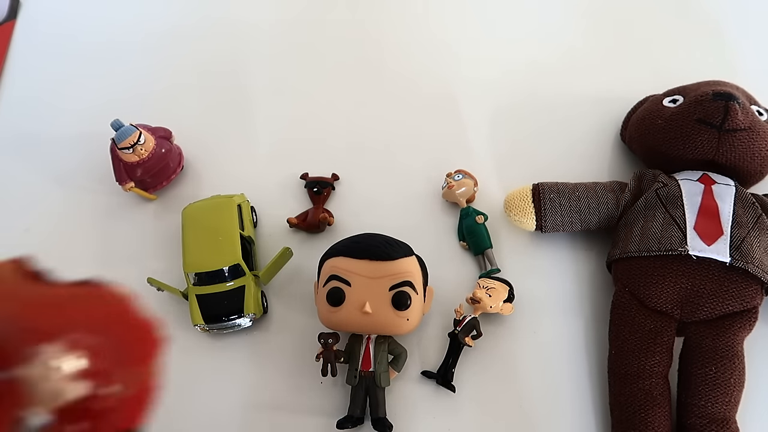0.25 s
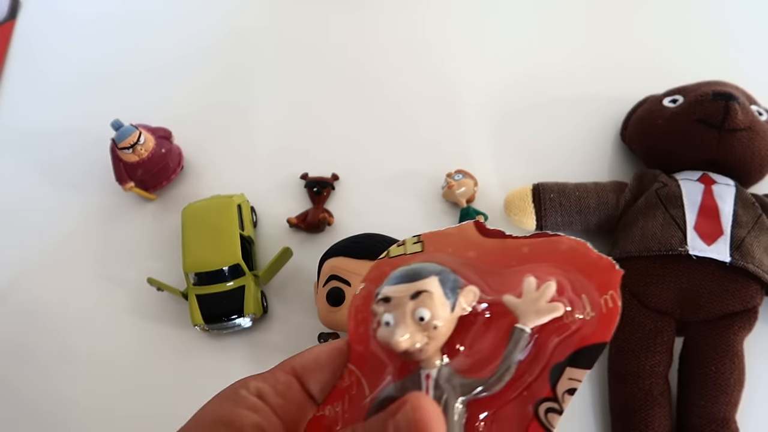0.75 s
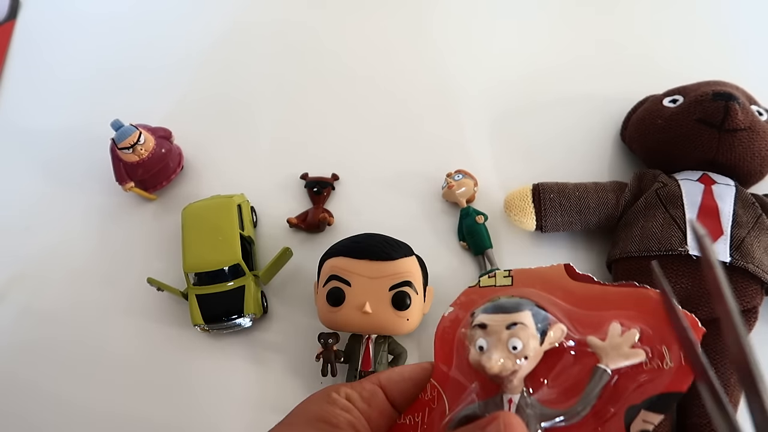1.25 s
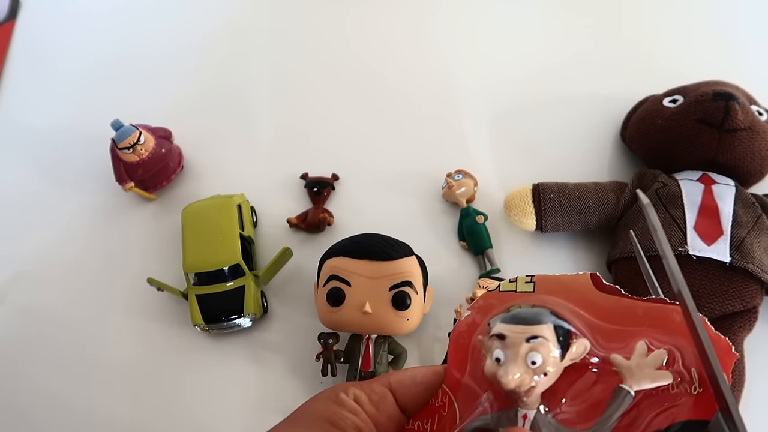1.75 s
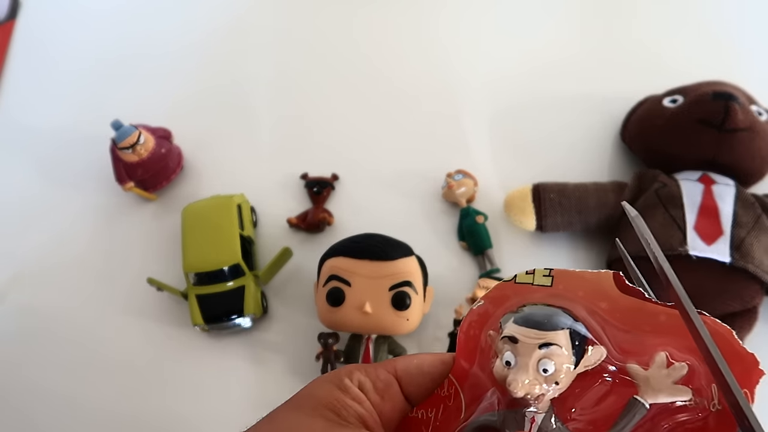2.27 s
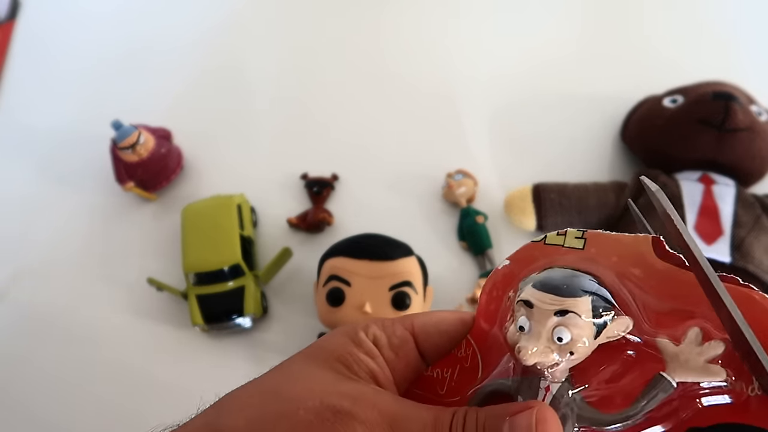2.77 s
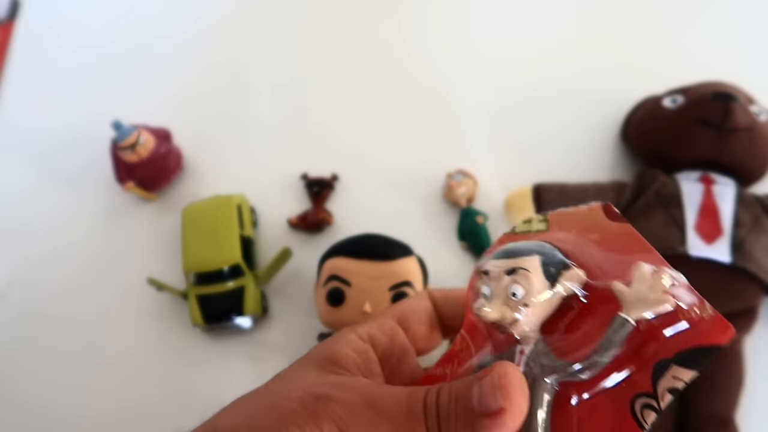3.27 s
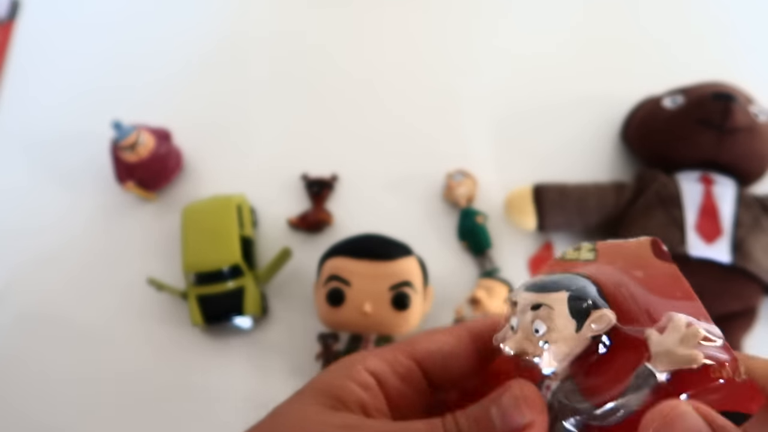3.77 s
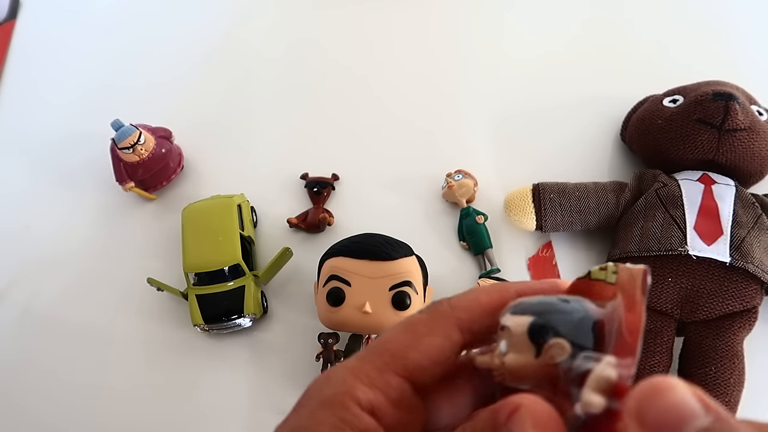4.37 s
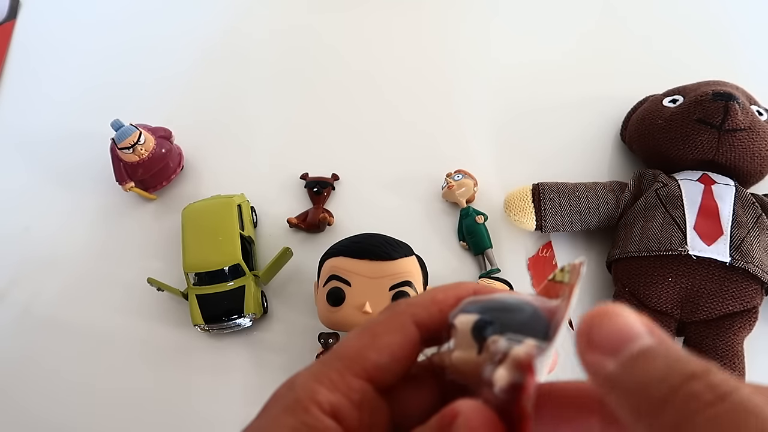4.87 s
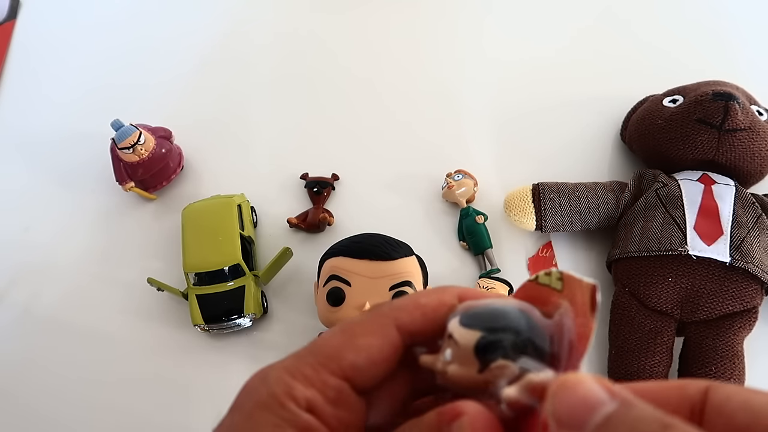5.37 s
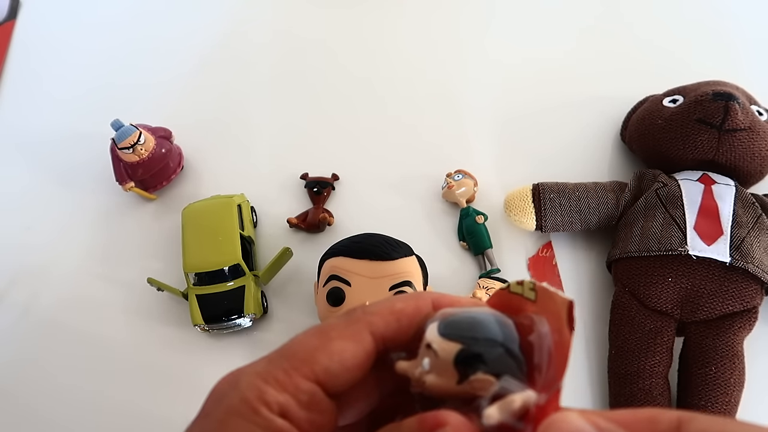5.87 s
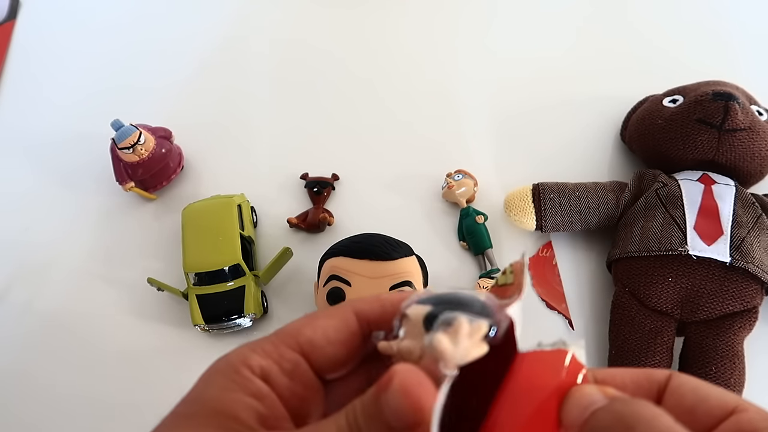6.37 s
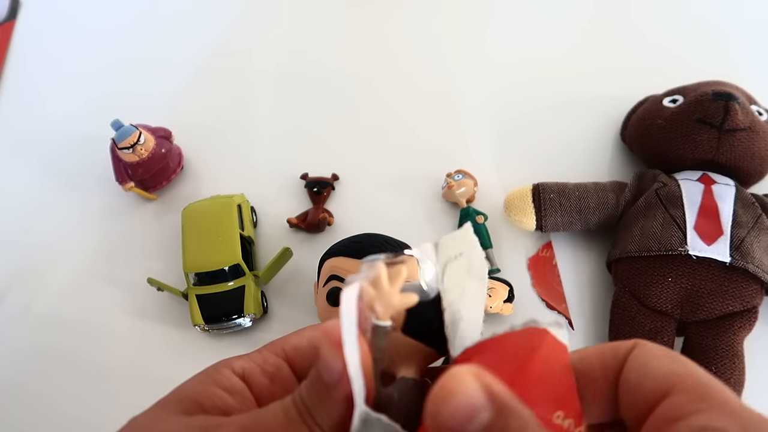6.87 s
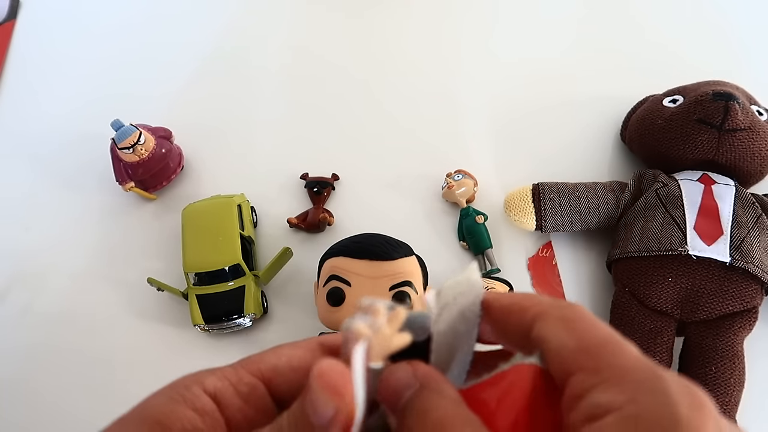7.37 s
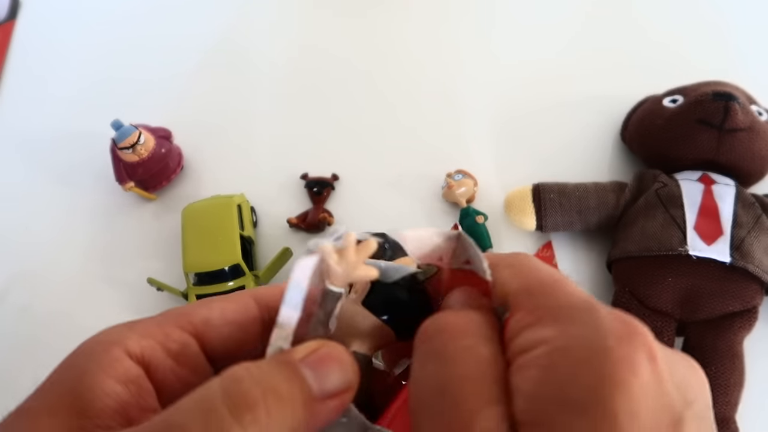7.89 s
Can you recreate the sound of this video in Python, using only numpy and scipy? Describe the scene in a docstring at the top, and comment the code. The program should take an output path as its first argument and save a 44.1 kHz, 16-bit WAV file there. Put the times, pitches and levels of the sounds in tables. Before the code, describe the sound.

Faint blade clicks, a crisp snip, a hard table knock, then stiff plastic crinkling and card tearing, ending in very loud sharp cracks.

```python
"""Scissors and a blister pack at a table

Small room, two close microphones: scissor blades click, bite through a plastic blister and meet the table.
Hands work the shell, which snaps, creases and pops, and rub and tear its card backing.
Impacts are shaped bursts and ringing modes, friction is coloured grains, and the room adds echo, air and hum.
The recorder's gain control ducks what follows the loudest hits."""
import sys
import numpy as np
from scipy import signal
from scipy.fft import rfft, irfft
from scipy.io import wavfile
from scipy.ndimage import uniform_filter1d, minimum_filter1d

SR = 44100
rng = np.random.default_rng(int(sys.argv[2]) if len(sys.argv) > 2 else 0)


def generate_wav(sig):
    """Save sig (samples, or channels by samples) to the path in sys.argv[1] as 16-bit PCM at SR."""
    pcm = np.round(np.clip(np.atleast_2d(sig).T, -1, 1) * 32767).astype(np.int16)
    wavfile.write(sys.argv[1], SR, pcm)


N = 358533
TIME = np.arange(N) / SR
TAPS = 2048  # length of a short impact, in samples
HZ = np.fft.rfftfreq(TAPS, 1 / SR)
SNAP_T60_S = 0.031
LOWEST_HZ = 108  # struck things radiate little below this
ATTACK_DB_PER_S, RELEASE_DB_PER_S = 700, 296  # flanks of a friction stroke
GRIP_TREBLE_DB, GRIP_RING_DB = 3, 0.5
CUT_HZ = 15600  # upper band limit

# colour of the room's air: [f/Hz, relative level/dB]
AIR_COLOUR = [(15, -30), (36, -2), (58, -5.5), (85, 4.5), (125, -4), (150, -3.5), (200, -4), (250, -14.5),
              (400, -10.5), (600, -18.5), (2000, -27.5), (5000, -35), (9000, -43.5), (16000, -47.5)]
# steady tones of the hum: [f/Hz, level before trim/dB]
HUM_TONES = [(86.1, -47.5), (150.7, -52), (337.8, -50)]
# how alike the two microphones hear the background: [f/Hz, likeness/0-1]
MIC_LIKENESS = [(100, 1), (290, 0.87), (640, 0.35), (4000, 0)]
# faint rubbing of the fingers that hold the pack: [t/s, level before trim/dB]
GRIP_LEVEL = [(0, -57), (.7, -55), (1, -61), (2.5, -56), (3.1, -46.5), (5.5, -49.5), (6.5, -50.5),
              (7.4, -45)]
# something slides, crunches or tears: [t/s, hold/s, level before trim/dB, treble/dB, ring of the card/dB]
FRICTION_STROKES = [(0, 0.039, -32, -22, -1), (0.103, 0.035, -41, -3, -22), (0.41, 0.13, -50.5, 15, 6),
                    (0.599, 0.014, -47.5, 5, 3), (0.74, 0.0066, -46.5, 16, 4),
                    (0.824, 0.025, -45.5, -10, 14), (1.362, 0.012, -41, 9, 3), (1.71, 0.02, -41, -4, -5),
                    (2.659, 0.071, -31.5, 3, -11), (2.95, 0.089, -34.5, 5, -3), (3.634, 0.041, -13, -11, 2),
                    (4.124, 0.029, -30.5, 1, -1), (4.53, 0.13, -41, 5, -5), (5.122, 0.34, -41, -7, 3),
                    (5.651, 0.013, -36.5, 10, 4), (5.913, 0.0049, -41.5, 13, 6),
                    (6.038, 0.11, -31.5, 17, 11), (6.06, 0.012, -32, 12, 10), (6.192, 0.029, -28, 6.5, 14),
                    (6.228, 0.14, -39, 19, 7), (6.377, 0.011, -23, 10.5, 5), (6.599, 0.055, -26.5, 7, 7.5),
                    (6.612, 0.017, -22, 1, 13), (6.77, 0.072, -29.5, 0, 10),
                    (7.017, 0.054, -32.5, 1.5, 9.5), (7.402, 0.15, -37.5, -2, -4),
                    (7.791, 0.19, -18, 9, 6.5), (8.012, 0.17, -17.5, 13.5, -4)]
# colour of the card: [f/Hz, relative level/dB]
CARD_COLOUR = [(80, -53), (330, 7), (550, -8.5), (800, 5), (1070, 4), (2400, -0.5), (3500, -2.5),
               (5000, -10), (7000, -16), (12000, -25), (16000, -34)]
# moving pitch of the card's ring: [t/s, f/Hz]
CARD_RING = [(0, 830), (.6, 1240), (6.1, 1160), (6.4, 1020), (6.62, 860), (6.8, 1040), (8, 1000)]
# colour of the plastic: [f/Hz, relative level/dB]
PLASTIC_COLOUR = [(100, -21.5), (300, -9.5), (600, -6), (1000, 0.5), (3000, -1.5), (5000, -7), (8000, -18),
                  (12000, -24.5), (16000, -41.5)]
# resonances of the plastic shell: [f/Hz, width/Hz, peak/dB]
SHELL_RESONANCES = [(996, 123, 4), (1465, 550, 2.5), (2730, 300, 2)]
# hard things meet the table: [t/s, clack before trim/dB, ring f/Hz, bass/dB, treble/dB, t60/s,
# table thump before trim/dB, scissors' ring before trim/dB]
TABLE_KNOCKS = [(0.004, -26.5, 2020, 33, -22, 0.13, -29, -38),
                (0.033, -24.5, 710, 28, -5, 0.13, -22.5, -38),
                (3.484, -12.5, 3580, 18, 6.5, 0.027, -1, -12.5),
                (3.506, -18.5, 1400, 24, -1, 0.049, -13, -19), (3.61, -3, 2180, 9.5, 4, 0.025, -2, -1.5),
                (3.641, 0, 2660, -3, 2, 0.021, -5, -9), (3.653, -4.5, 2600, -6, 1, 0.023, 2, -5)]
# modes of the table top: [f/Hz, relative level/dB, t60/s]
TABLE_MODES = [(130.5, -11, 0.18), (180, -10, 0.16), (297, 3.5, 0.057), (330, -10.5, 0.11),
               (386, -15.5, 0.19), (438, -22, 0.27), (694, -17, 0.18), (810, -12, 0.077)]
# modes of the scissors as they land: [f/Hz, relative level/dB, t60/s]
LANDING_MODES = [(970, -35, 0.27), (1340, -18, 0.49), (1470, -15.5, 0.69), (1860, -6, 0.16),
                 (2060, -16, 0.18)]
# the stiff plastic cracks: [t/s, level/dB, ring f/Hz, bass/dB, treble/dB]
PLASTIC_SNAPS = [(0.097, -35.5, 2560, -23, -7), (0.152, -36.5, 2780, -1, -12), (0.416, -41, 2650, 20, -19),
                 (0.604, -45, 2680, 5, -15), (1.096, -32.5, 3000, 17.5, -14), (1.39, -37.5, 1650, 12, 13),
                 (1.742, -34.5, 2300, 22, -5), (1.966, -39, 1550, -3, -26), (2.507, -22, 840, 8.5, -4),
                 (2.935, -10.5, 700, 2, 10), (3.3, -30.5, 1190, -13, -4.5),
                 (3.855, -21.5, 1730, 23.5, 16.5), (3.88, -23, 910, 29.5, 14), (4.134, -24, 5000, 27.5, 9),
                 (4.213, -28.5, 1500, 12, -3), (4.332, -28, 1630, -5, 3), (4.355, -26, 695, 15, 4),
                 (4.427, -29.5, 1270, 0, -5), (4.563, -30, 1400, 6, 1), (4.612, -23, 720, 6, 7.5),
                 (4.761, -27.5, 1450, 26, 1), (4.83, -12.5, 1840, -18, 0.5), (4.867, -10, 740, -11, 9.5),
                 (5.141, -20, 1660, 1, -21), (5.224, -26, 1250, 5, -9), (5.301, -21.5, 1170, 5, -6),
                 (5.343, -21.5, 1150, 3.5, -13), (5.396, -19.5, 4730, -11.5, -13),
                 (5.419, -28, 1080, 10, -17), (5.548, -35.5, 1830, 9, 0), (5.589, -12.5, 1550, -2.5, 7),
                 (5.656, -27, 4750, 3, -17), (5.804, -36.5, 1230, 7, 9.5), (5.829, -35.5, 3870, 6, -7),
                 (6.054, -23, 1000, -10, 4), (6.249, -15.5, 1030, 13.5, 3.5), (6.372, -20.5, 1070, 24, -9),
                 (6.396, -24, 1060, 15, 25), (6.64, -19, 730, 13, -39), (6.81, -14.5, 5760, -19, 2.5),
                 (6.888, -24.5, 3000, 14, -1), (6.943, -31, 3270, 11, 5), (6.984, -23, 4640, 3, -0.5),
                 (7.054, -26, 7200, 7, -18), (7.134, -35.5, 1140, 9, 10.5), (7.397, -30.5, 3130, 24, 8),
                 (7.439, -29, 1200, 22, 10), (7.488, -26.5, 900, 3, 0.5), (7.528, -25, 3330, 21.5, 4.5),
                 (7.638, -30.5, 1060, 21, 7.5), (7.793, 8, 2950, 10.5, 16.5), (7.848, 2, 3150, 10, 9),
                 (7.887, -8, 760, 17, 5), (7.937, -13, 2650, 15, 11), (7.994, -6, 4100, -5, 0),
                 (8.084, -18, 1000, 13, 12), (8.107, -19.5, 4600, -21.5, 3)]
# a facet of the pack buckles with a short, hollow pop: [t/s, level/dB, f/Hz]
FACET_POPS = [(0.68, -44, 1270), (0.811, -44.5, 1070), (0.851, -44, 1230), (1.228, -44, 800),
              (2.224, -44.5, 880), (4.293, -29, 1180), (4.306, -26.5, 1190), (5.162, -25, 1170),
              (5.353, -20.5, 1340), (5.376, -30, 1200), (6.207, -30.5, 1060), (6.379, -23.5, 1030),
              (6.608, -25, 1000), (6.625, -22, 960), (6.725, -20.5, 930), (6.734, -19.5, 970),
              (6.741, -25, 980), (6.75, -19, 2960), (6.753, -23, 1000), (6.77, -23, 2900),
              (6.782, -24.5, 1040), (6.793, -18.5, 2800), (7.472, -32, 910), (7.499, -26.5, 1050),
              (7.667, -31, 990), (7.766, -34.5, 980), (7.792, 3, 1360), (7.862, -15, 830)]
# the scissor blades slip on each other: [t/s, level/dB]
BLADE_SLIPS = [(1.168, -47), (1.316, -39), (1.464, -44), (1.56, -50), (1.623, -45.5), (1.664, -43.5),
               (1.806, -40), (1.81, -47), (1.862, -46.5), (1.884, -44.5), (1.903, -48), (1.933, -42),
               (2.046, -39.5), (2.084, -40.5), (2.146, -44), (2.195, -41), (2.241, -43), (2.258, -46.5),
               (2.294, -46), (2.374, -40.5), (2.436, -47.5), (2.576, -40), (2.738, -16), (2.746, -13),
               (2.76, -14), (2.786, -15.5), (2.87, -13.5), (2.894, -19), (3.122, -35), (3.133, -39),
               (3.211, -46.5), (3.362, -39.5), (3.387, -39.5), (3.409, -36.5)]
# the clicks brighten as the blades close towards their tips, then dull: [t/s, treble/dB]
SLIP_TREBLE = [(1.5, -7.5), (2.45, -6.5), (2.73, 0), (2.745, 10), (2.89, 21), (3.3, -16)]
# colour of the blades: [f/Hz, relative level/dB]
BLADE_COLOUR = [(200, -36), (500, -11), (720, -3), (1400, 5.5), (2500, 9), (4200, 6.5), (5500, 3),
                (8000, -7), (11000, -10.5), (13000, -20), (16000, -39.5)]
# resonances and dips of the blades, before chance variation: [f/Hz, width/Hz, peak/dB]
BLADE_RESONANCES = [(1863, 130, 11), (2600, 220, 9.5), (3020, 590, -2), (3300, 240, 7), (3960, 200, 0),
                    (4160, 300, 10), (4750, 380, 7), (5530, 260, 2.5), (7120, 500, 9.5)]
# the blades bite through the plastic: [t of the break/s, straining before it/s, level/dB, ring of the sheet/dB]
BLADE_BITES = [(2.664, 0.0155, -11, 13), (2.675, 0.007, -7.5, 12), (2.697, .006, -19, 8),
               (2.713, .002, -15, 8), (2.718, .004, -13, 4.5)]
# colour of a bite, with the sheet clamped between the blades: [f/Hz, relative level/dB]
BITE_COLOUR = [(150, -24.5), (350, -5), (550, -16.5), (800, -3), (1400, 4), (1900, 5.5), (2400, -1),
               (2900, -16), (3300, 5), (4200, 2), (5500, -13.5), (8000, -22.5), (11000, -23.5),
               (16000, -48)]
# difference between the microphones for near sounds: [f/Hz, relative level/dB]
MIC_DIFFERENCE = [(100, -40), (500, -33), (1000, -22), (2000, -16), (4000, -8.5), (8000, -2), (14000, -1.5)]
# the room's decay: [f/Hz, t60/s]
ROOM_DECAY = [(150, .4), (500, .3), (1200, .38), (3000, .33), (7000, .27), (14000, .18)]
# strength of the room's echo: [f/Hz, relative level/dB]
ROOM_LEVEL = [(150, -7), (500, -7.5), (1300, -12), (4000, -12.5), (12000, -12.5)]


def amp(db):
    """Decibels to gain."""
    return 10 ** (np.asarray(db) / 20)


def unit(x):
    """Scales to rms 1."""
    return x / np.sqrt(np.mean(x ** 2) + 1e-20)


def read(points, hz):
    """Reads a table along log frequency."""
    f, value = np.transpose(points)
    return np.interp(np.log(hz + 1), np.log(f + 1), value)


def over_time(points, t):
    """Reads a table along time."""
    return np.interp(t, *np.transpose(points))


def slow_noise(count):
    """Random values joined by straight lines over the whole scene."""
    return np.interp(TIME, np.linspace(0, TIME[-1], count), rng.standard_normal(size=count))


def add(mix, s, sound):
    """Lays a sound into the mix at time s."""
    part = mix[max(round(s * SR), 0):][:len(sound)]
    part += sound[:len(part)]


def shaped(x, points):
    """Filters by a table of dB."""
    gain = amp(read(points, np.fft.rfftfreq(x.shape[-1], 1 / SR)))
    return irfft(rfft(x) * gain, x.shape[-1])


def hump(hz, centre_hz, octaves):
    """A bell of height 1 along log frequency."""
    return np.exp(-(np.log2((hz + 1) / centre_hz) / octaves) ** 2)


def resonances(modes):
    """The peaks and dips of a body, in dB at each frequency."""
    return sum(db / (1 + (2 * (HZ - hz) / width) ** 2) for hz, width, db in modes)


def shelves(bass_db, treble_db, bass_hz=700, treble_hz=4500):
    """Lifts the low and the high end, in dB."""
    low, high = (HZ / bass_hz) ** 3, (HZ / treble_hz) ** 3
    return bass_db / (1 + low) + treble_db * high / (1 + high)


def causal(db):
    """Spectrum with this colour whose sound starts sharply and rings afterwards."""
    log_gain = np.log(amp(np.r_[db, db[-2:0:-1]]))
    return np.exp(np.conj(signal.hilbert(log_gain)))[:len(db)]


def echo(delay_s, share):
    """Spectrum of one reflection."""
    return share * np.exp(-2j * np.pi * HZ * delay_s)


def at_level(sound, db):
    """Sets the level of a short sound, taken over a hundredth of a second."""
    return amp(db) * sound / np.sqrt(np.sum(sound ** 2) / (SR / 100))


def background(air_db=-44.5, hum_db=-2, waver=0.33):
    """Low rumble and hiss of the room, with the wavering tones of some appliance."""
    a, b = rfft(rng.standard_normal((2, N)))
    same = np.clip(read(MIC_LIKENESS, np.fft.rfftfreq(N, 1 / SR)), 0, 1)
    mid, side = a * np.sqrt(1 + same), b * np.sqrt(1 - same)
    air = amp(air_db) * unit(shaped(irfft([mid + side, mid - side], N), AIR_COLOUR))
    hum = np.zeros(N)
    for hz, db in HUM_TONES:
        drift = waver * slow_noise(40)  # moves both strength and phase
        tone = np.sin(2 * np.pi * (hz * TIME + rng.random()) + drift)
        hum += amp(db + hum_db) * np.sqrt(2) * (1 + drift) * tone
    return air + hum


def effort(t):
    """Level, treble and ring of the friction, in dB: strokes swell, hold and die away above the steady grip."""
    total = amp(over_time(GRIP_LEVEL, t)) ** 2
    treble, ring = GRIP_TREBLE_DB * total, GRIP_RING_DB * total  # averages weighted by power
    for s, hold, db, treble_db, ring_db in FRICTION_STROKES:
        before, after = np.maximum(s - t, 0), np.maximum(t - s - hold, 0)
        power = amp(db - ATTACK_DB_PER_S * before - RELEASE_DB_PER_S * after) ** 2
        total = total + power
        treble = treble + treble_db * power
        ring = ring + ring_db * power
    return 10 * np.log10(total), treble / total, ring / total


def rubbing(level_db=-1, grains_per_s=2400, spread_db=2.0, hiss=0.28, patchy_db=2.5,
            treble_hz=4500, ring_octaves=0.25):
    """Fibres catch and let go as tiny grains over a sliding hiss; the card's ring shifts as it bends."""
    sizes = amp(spread_db * np.minimum(rng.exponential(1, N), 5)) * rng.choice([-1, 1], N)
    grains = unit(sizes * (rng.random(N) < grains_per_s / SR)) + hiss * rng.standard_normal(N)
    hz, t, z = signal.stft(unit(grains), SR, nperseg=256, noverlap=192)
    patches = uniform_filter1d(rng.standard_normal(z.shape), size=3, axis=0)
    patches = unit(uniform_filter1d(patches, size=24, axis=1))
    high = 1 - 1 / (1 + (hz[:, None] / treble_hz) ** 3)
    db, treble_db, ring_db = effort(t)
    ring = ring_db * hump(hz[:, None], over_time(CARD_RING, t), ring_octaves)
    colour = amp(read(CARD_COLOUR, hz)[:, None] + high * treble_db + ring + patchy_db * patches)
    colour /= np.sqrt(np.mean(colour ** 2, axis=0))  # colour leaves the level alone
    sound = signal.istft(z * colour, SR, nperseg=256, noverlap=192)[1][:N]
    sound *= unit(amp(patchy_db * slow_noise(1000)))  # fibres give way in bunches
    return sound * amp(level_db + np.interp(TIME, t, db))


def snap(db, ring_hz, bass_db, treble_db, t60, ring_db=8, ring_octaves=0.38, crack=4.9, evenness=0.21,
         rise=0.00047, flip_s=0.0023, flip_db=4, table_s=0.001126, table_share=0.27):
    """A facet flips with a crack; bending waves scatter and die in milliseconds; the table reflects them."""
    t = np.arange(TAPS) / SR
    envelope = amp(flip_db * np.exp(-(t / flip_s) ** 2) - 60 * t / t60) * (1 - np.exp(-t / rise))
    waves = rng.standard_normal(TAPS) * envelope
    waves[0] += crack
    z = rfft(waves)
    ripple_db = 10 * np.log10(uniform_filter1d(abs(z) ** 2, size=30))  # partly evened out below
    ring = ring_db * hump(HZ, ring_hz, ring_octaves)  # the facet that flips has its own pitch
    colour = read(PLASTIC_COLOUR, HZ) + resonances(SHELL_RESONANCES) + ring + shelves(bass_db, treble_db)
    paths = 1 + echo(table_s * 2 ** rng.uniform(-0.49, 0.532), table_share)
    return at_level(irfft(z * paths * causal(colour - evenness * ripple_db)), db)


def crinkle(count=260, level_db=-6, spread_db=3.5, ring_hz=1300, octaves=0.31, bass_db=4, t60=0.03):
    """Small creases flip at random, as hard as the hands are working."""
    out = np.zeros(N)
    times = rng.uniform(0, TIME[-1], count)
    chance = np.clip(rng.standard_normal((count, 2)), -2, 2)
    for s, db, treble_db, _, (size, pitch) in zip(times, *effort(times), chance):
        crease_db = level_db + db + spread_db * size
        add(out, s, snap(crease_db, ring_hz * 2 ** (octaves * pitch), bass_db, treble_db, t60))
    return out


def ringing(modes, rattle, rise_s, rattle_s=0.011):
    """Half a second of an object's modes; loose contact breaks up their strength and phase."""
    t = np.arange(SR // 2) / SR
    out, rattle = np.zeros(len(t)), np.clip(rattle, 0, 1)
    for hz, db, t60 in modes:
        a, b = uniform_filter1d(rng.standard_normal((2, len(t))), max(round(rattle_s * SR), 1))
        sway = np.sqrt(1 - rattle ** 2) + rattle * (unit(a) + 1j * unit(b)) / np.sqrt(2)
        out += amp(db - 60 * t / t60) * (sway * np.exp(2j * np.pi * hz * t)).imag
    high_pass = signal.butter(2, LOWEST_HZ, "high", fs=SR, output="sos")
    return signal.sosfilt(high_pass, out * (1 - np.exp(-t / rise_s)))


def knocks(clack_db=-1, thump_db=-3, ring_db=-3):
    """Each knock clacks, thumps the table top and sets the loose scissors rattling."""
    out = np.zeros(N)
    for s, *clack, table_db, scissors_db in TABLE_KNOCKS:
        add(out, s, amp(clack_db) * snap(*clack, ring_db=9, ring_octaves=0.36))
        add(out, s, amp(table_db + thump_db) * ringing(TABLE_MODES, rattle=0.095, rise_s=0.00036))
        add(out, s, amp(scissors_db + ring_db) * ringing(LANDING_MODES, rattle=0.64, rise_s=0.001))
    return out


def blister(creak_db=-19, creak_s=0.0021):
    """All snaps of the plastic shell; each creaks just before it gives way."""
    out = np.zeros(N)
    for s, *blow in PLASTIC_SNAPS:
        add(out, s - creak_s, amp(creak_db) * snap(*blow, SNAP_T60_S))
        add(out, s, snap(*blow, SNAP_T60_S))
    return out


def buckling(swell_s=0.00073, crack_db=-5):
    """Each pop swells and dies within a few milliseconds at the facet's pitch, with a little crackle."""
    out, t = np.zeros(N), np.arange(TAPS) / SR
    age = t / swell_s
    for s, db, hz in FACET_POPS:
        pop = age ** 2 * np.exp(-age) * np.sin(2 * np.pi * (hz * t + rng.random()))
        add(out, s, at_level(pop, db) + snap(db + crack_db, hz, 0, 0, SNAP_T60_S))
    return out


def jolt(db, colour_db, scatter, scatter_t60, echoes=((.0013, .35), (.0077, .13))):
    """A jolt at the blades rings with the given colour, with echoes from the pack and the table."""
    paths = 1 + sum(echo(delay, share) for delay, share in echoes)
    push = scatter * rng.standard_normal(TAPS) * amp(-60 * np.arange(TAPS) / SR / scatter_t60)
    push[0] += 1
    return at_level(irfft(rfft(push) * paths * causal(colour_db)), db)


def blade_click(db, treble_db, sheet_db, sheet_hz=900, sheet_octaves=0.67, vary=0.14, detune=0.012):
    """One slip rings the blades and the sheet between them; the point of contact changes each resonance."""
    chance = np.clip(rng.standard_normal((len(BLADE_RESONANCES), 2)), -2, 2)
    modes = [(hz * (1 + detune * a), width, peak_db * (1 + vary * b))
             for (hz, width, peak_db), (a, b) in zip(BLADE_RESONANCES, chance)]
    sheet = sheet_db * hump(HZ, sheet_hz, sheet_octaves)
    colour = read(BLADE_COLOUR, HZ) + resonances(modes) + sheet + shelves(0, treble_db, treble_hz=5400)
    return jolt(db, colour, scatter=0.097, scatter_t60=0.025)


def scissors(sheet_db=4):
    """The blades stick and slip on each other as they close."""
    out = np.zeros(N)
    for s, db in BLADE_SLIPS:
        add(out, s, blade_click(db, over_time(SLIP_TREBLE, s), sheet_db))
    return out


def cutting(fractures_per_s=370, strain_db=-7, build_db_per_s=500, sheet_hz=880, sheet_octaves=0.41,
            jitter=0.14):
    """Each bite is a quick run of small fractures that grow as the blades press in, then a sharp break."""
    out = np.zeros(N)
    for s, length, db, sheet_db in BLADE_BITES:
        colour = read(BITE_COLOUR, HZ) + sheet_db * hump(HZ, sheet_hz, sheet_octaves)
        add(out, s, jolt(db, colour, scatter=0.11, scatter_t60=0.024))
        for k in np.arange(1, length * fractures_per_s):  # counted back from the break
            before = (k + jitter * rng.standard_normal()) / fractures_per_s
            fracture_db = db + strain_db - build_db_per_s * before
            add(out, s - before, jolt(fracture_db, colour, scatter=0.06, scatter_t60=0.036))
    return out


def microphones(x, balance_db, lead, wander, scatter=0.86, scatter_s=0.0008, shadow=0.35):
    """Two close ports: treble arrives out of step, by which spot sounds, and scattered by the hands."""
    spot = slow_noise(120)
    paths = rng.standard_normal(TAPS) * np.exp(-TIME[:TAPS] / scatter_s) * TIME[:TAPS]
    spread = rfft(paths / np.linalg.norm(paths), N)
    # the scattering differs more in timing than in level
    scattered = irfft(rfft(x) * (shadow * spread.real + 1j * spread.imag), N)
    out_of_step = signal.hilbert(x).imag * np.sin(lead + wander * spot)  # lead and wander in radians
    side = shaped(out_of_step + scatter * scattered, MIC_DIFFERENCE)
    return np.array([x + side, x - side]) * amp([[balance_db], [-balance_db]])


def room(x, delay=.006, wide_hz=1800):
    """A diffuse tail, each band dying at its own speed; the bass is alike at both microphones."""
    hz, t, z = signal.stft(rng.standard_normal((2, SR // 2)), SR, nperseg=256)
    fade = amp(-60 * t / read(ROOM_DECAY, hz)[:, None])
    energy = np.sum(fade ** 2, axis=1, keepdims=True) * t[1] * SR
    fade *= amp(read(ROOM_LEVEL, hz))[:, None] / np.sqrt(energy)
    z[1] *= (hz ** 2 / (hz ** 2 + wide_hz ** 2))[:, None]
    mid, side = signal.istft(z * fade, SR, nperseg=256)[1]
    tail = np.pad([mid + side, mid - side], ((0, 0), (round(delay * SR), 0)))
    return signal.fftconvolve(x[None], tail, axes=1)[:, :N]


def gain_control(x, threshold_db=-18.0, ratio=5, window_s=0.029, hold_s=0.63, recover_db_per_s=12.0):
    """Loud sounds push the gain down; it waits, then slowly comes back."""
    window, hold = round(window_s * SR), round(hold_s * SR)
    power = abs(uniform_filter1d(np.mean(x ** 2, axis=0), window))
    level_db = 10 * np.log10(power + 1e-12)
    cut_db = np.minimum(threshold_db - level_db, 0) * (1 - 1 / ratio)
    held_db = minimum_filter1d(cut_db, hold, origin=(hold - 1) // 2, mode="nearest")
    recovery = recover_db_per_s * TIME
    gain_db = np.minimum.accumulate(held_db - recovery) + recovery
    return x * amp(uniform_filter1d(gain_db, window // 2))


def scene():
    """Hands close to the microphones, the scissors set further to the right, in a small room."""
    hands = blister() + buckling() + crinkle() + knocks() + rubbing()
    blades = scissors() + cutting()
    near_hands = microphones(hands, balance_db=-0.3, lead=0.53, wander=0.21)
    near_blades = microphones(blades, balance_db=-0.3, lead=1.2, wander=0.38)
    return near_hands + near_blades + room(hands + blades) + background()


def record(dry):
    """Gain control, overload on the loudest cracks, then the band limit."""
    limited = np.clip(gain_control(dry), -1, 1)
    low_pass = signal.firwin(511, CUT_HZ, window=("kaiser", 9), fs=SR)
    return signal.oaconvolve(limited, low_pass[None], "same")


dry = scene()
out = record(dry)
generate_wav(out)
```